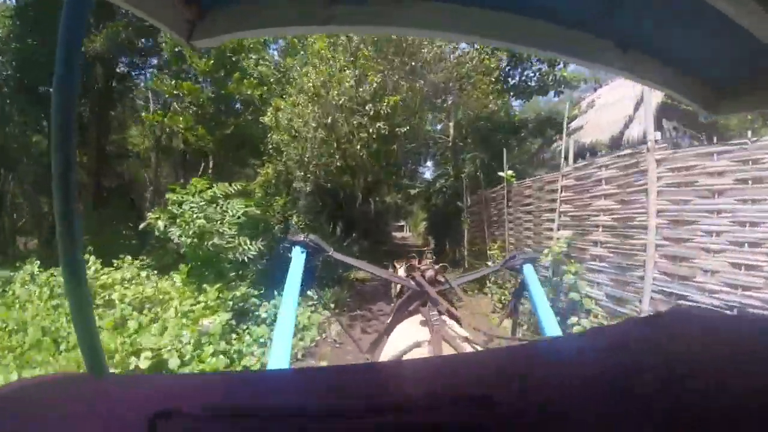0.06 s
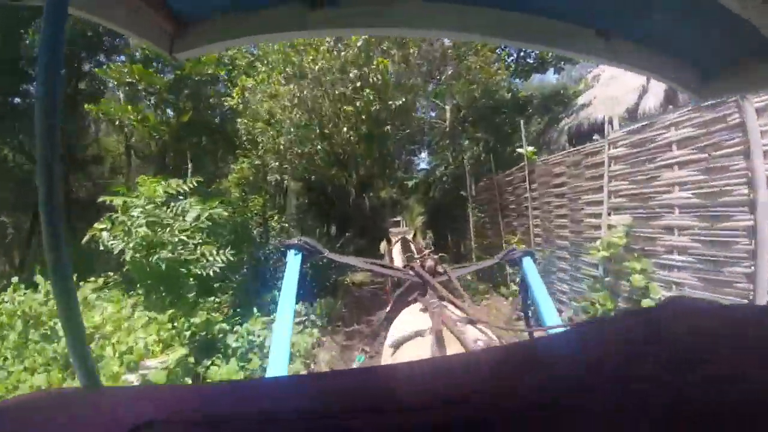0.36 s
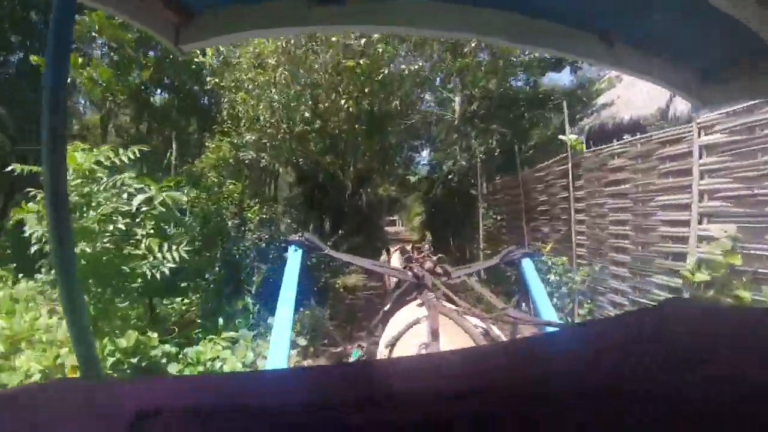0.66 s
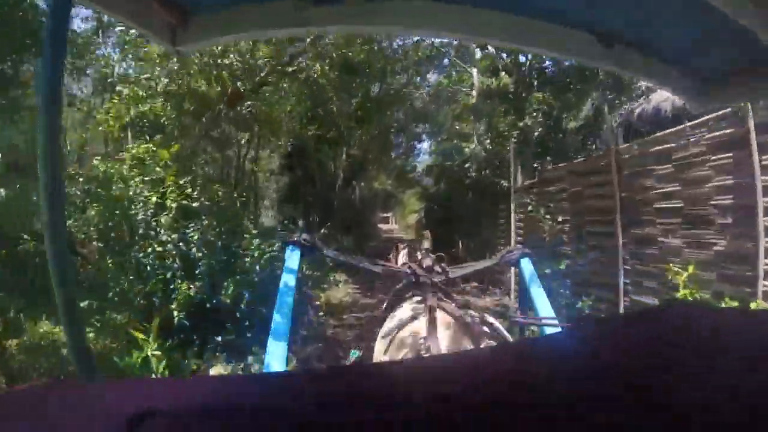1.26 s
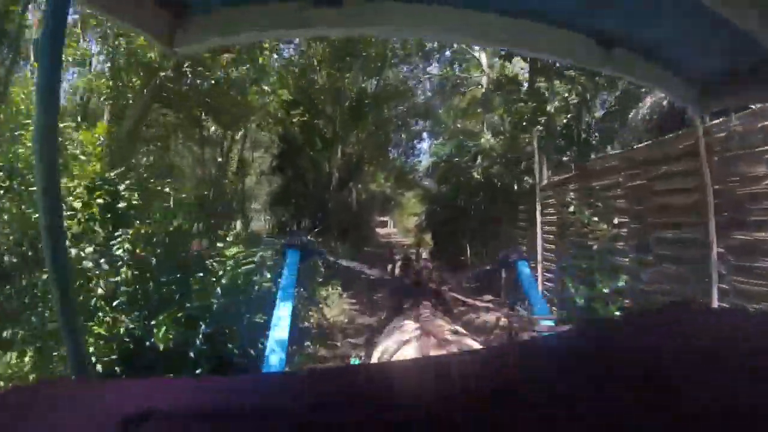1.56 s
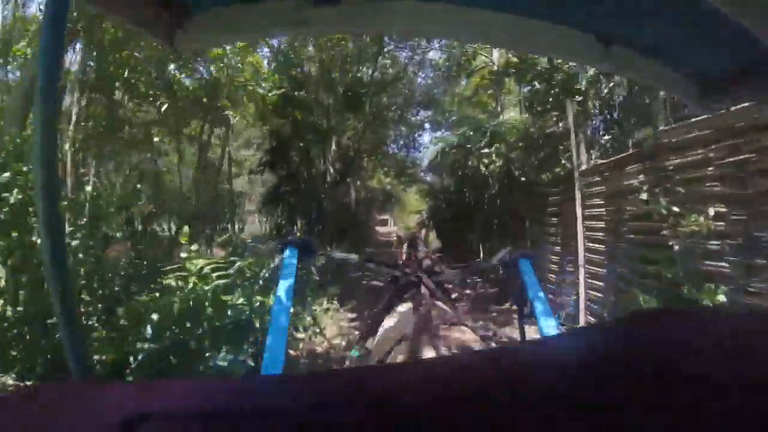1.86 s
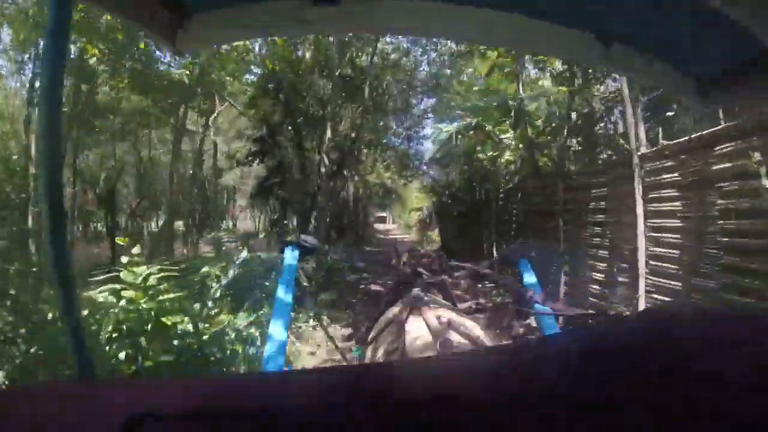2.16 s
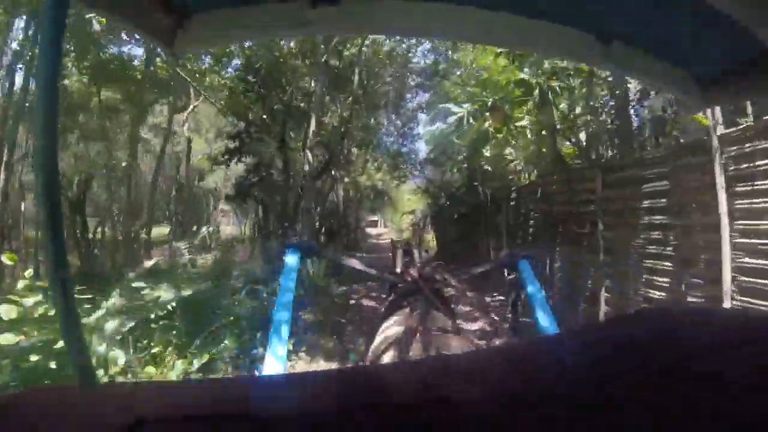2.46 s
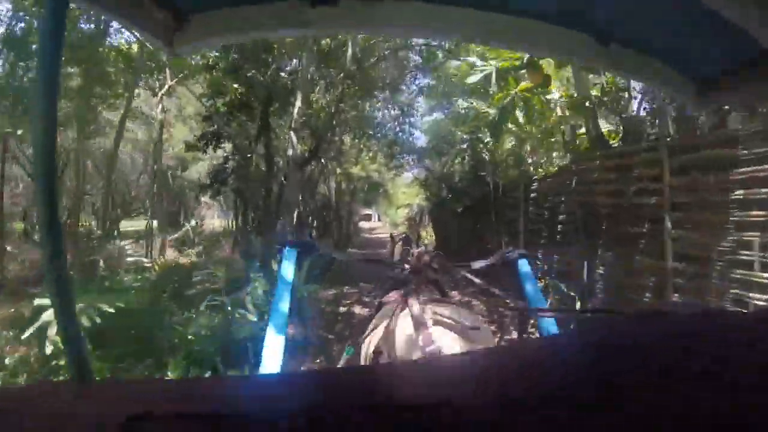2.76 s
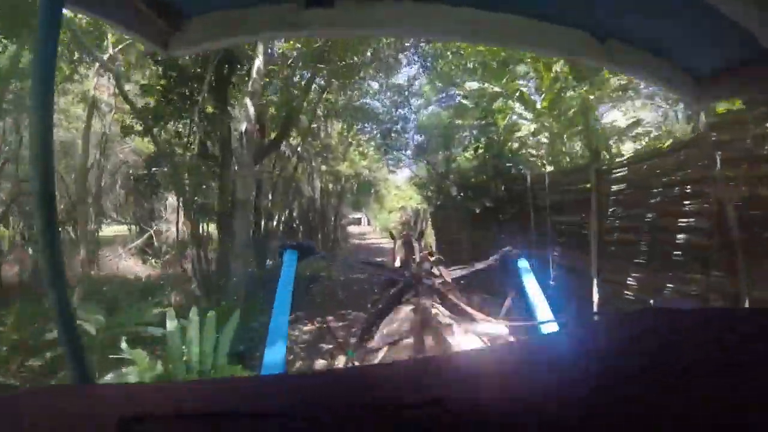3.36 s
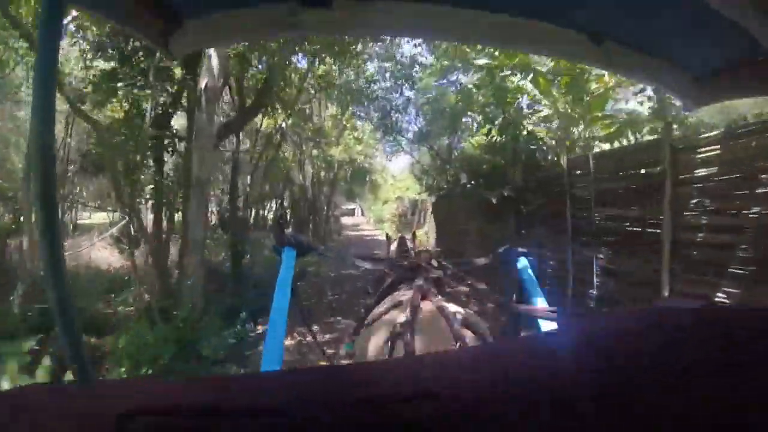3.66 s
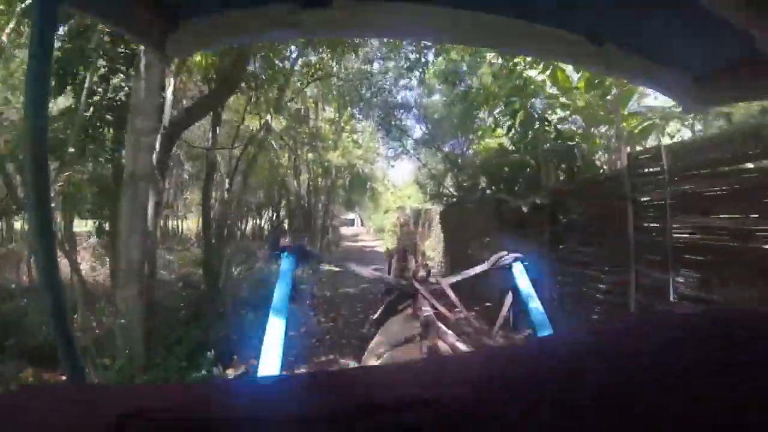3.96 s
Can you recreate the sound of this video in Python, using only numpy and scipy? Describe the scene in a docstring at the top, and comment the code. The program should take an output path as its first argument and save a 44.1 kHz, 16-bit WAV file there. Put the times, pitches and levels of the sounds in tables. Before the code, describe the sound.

Cart wheels grind over grit with wooden knocks, hoof falls and a faint harness bell.

```python
"""Horse cart on a dirt track

Heard from the seat, over the faint hiss of trees, the wheels crunch through grit and slats chatter.
Hoof falls and bumps excite the damped modes of the wooden body, and the frame rumbles. The harness
rustles and ticks; a thin high ringing, probably a small harness bell, comes and goes. Short squeaks and
sharp hoof clicks keep step with the trot."""
import sys
import numpy as np
from scipy import signal
from scipy.fft import rfft, irfft
from scipy.io import wavfile

SR = 44100
rng = np.random.default_rng(int(sys.argv[2]) if len(sys.argv) > 2 else 0)


def bounce(signal):
    """Save signal as a 16-bit WAV file at the path given by the first command-line argument."""
    frames = np.transpose(np.atleast_2d(signal))
    limited = np.clip(frames, -1, 1)
    pcm = np.round(limited * 32767).astype(np.int16)
    wavfile.write(sys.argv[1], SR, pcm)


N = 176400
TIME = np.arange(N) / SR

# Spectra of the woods, the rumble, the grit heard through the cart and the rustling harness.
# Each row: frequency in Hz, relative level in dB.
WOODS_SPECTRUM = [(300,-10.5),(4500,-15),(13000,-37)]
RUMBLE_SPECTRUM = [(24,5),(70,-14.5),(300,-36)]
GRIT_SPECTRUM = [(390, -6), (850, -8.5), (980, 2), (1170, -8.5), (1300, -2), (1420, -10), (1560, 0),
                 (2250, 1), (2540, -10.5), (2890, 0.5), (3140, -15), (3490, -11), (4100, -8.5), (5150, -13),
                 (5600, -12), (6890, -27)]
RUSTLE_SPECTRUM = [(5500,10),(6800,-3),(9700,-5),(10600,-37)]
# Patches of grit under a wheel. Each row: start in seconds, length in seconds, relative level in dB.
GRIT_PATCHES = [(0.023,0.046,-44.5),(0.089,0.086,-45),(0.134,0.047,-32.5),(0.196,0.093,-35.5),(0.276,0.14,-39),(0.471,0.039,-37),
                (0.602,0.12,-43),(0.65,0.015,-38.5),(0.765,0.065,-41),(0.862,0.084,-41),(0.98,0.014,-40),(1.014,0.07,-44),
                (1.123,0.058,-39.5),(1.283,0.051,-42),(1.365,0.037,-40.5),(1.427,0.025,-39.5),(1.496,0.027,-37),
                (1.585,.145,-44),(1.758,0.057,-41.5),(1.881,0.014,-43),(1.959,0.0042,-39),(2.038,0.021,-44),(2.14,0.085,-41.5),
                (2.264,0.018,-38.5),(2.314,0.026,-39),(2.404,0.023,-45.5),(2.679,0.041,-39),(2.747,0.04,-41.5),(2.797,0.0046,-42),(2.841,0.023,-40.5),(2.945,0.011,-43),
                (3.056,0.027,-43.5),(3.143,0.075,-39),(3.262,0.1,-46),(3.3,0.016,-35),(3.53,0.11,-47.5),(3.613,0.075,-40),
                (3.76,0.025,-37),(3.799,0.11,-42),(3.951,0.022,-40.5)]
# Hoof falls and bumps. Each row: time in seconds, then drive to boards, frame and panels in dB.
BODY_BLOWS = [(0.153, -36, -27, -29), (0.469, -45, -41, -68), (.56, -46, -45, -50), (0.761, -35, -55, -55),
              (.797, -44, -56, -31), (0.852, -36.5, -53, -43), (0.947, -38, -35.5, -36.5),
              (1.005, -43, -38.5, -66), (1.1, -43, -43, -48), (1.268, -37.5, -45, -51),
              (1.492, -36, -39.5, -37.5), (1.758, -33.5, -35, -38.5), (1.951, -35, -40.5, -40.5),
              (2.253, -43, -36.5, -53), (2.399, -36.5, -40, -37.5), (2.527, -33.5, -38, -37),
              (2.566, -51, -50, -40.5), (2.836, -34.5, -36, -34.5), (3.301, -39, -59, -27.5),
              (3.531, -40.5, -44, -65), (3.666, -39.5, -58, -51), (3.751, -40, -41, -49),
              (3.949, -36.5, -39, -61)]
# Modes of the wooden parts, the harness rings and the bell, whose first two beat together.
# Each row: frequency in Hz, relative level in dB, time to decay by 60 dB in seconds.
FRAME_RESONANCES = [(30.7, 6.5, 0.22), (79.5, 10, 0.053)]
BOARD_RESONANCES = [(174, 1.3, 0.017), (279, 1.44, 0.097)]
PANEL_RESONANCES = [(485, 0.046, 0.028), (813, 0.42, 0.014), (970, 0.26, 0.017), (1720, 0.074, .008)]
SLAT_RESONANCES = [(1009, 2, 0.019), (1748, -2.5, 0.017)]
RING_RESONANCES = [(7800, 6, 0.079), (9500, -18, 0.038)]
BELL_RESONANCES = [(4804, 0, .42), (4836, -1.5, .3), (12150, -26, .15)]
# Blows to the harness rings and to the bell. Each row: start in seconds, drive in dB.
RING_BLOWS = [(.505,-52.5),(1.497,-61),(2.028,-59.5),(2.997,-63),(3.265,-63)]
BELL_BLOWS = [(1.055,-51),(1.47,-49.5),(1.52,-49),(1.615,-45),(1.81,-47.5),(2.015,-44),(2.15,-46.5),(2.452,-53.5),(2.548,-50.5),(2.622,-43),(2.675,-48),(2.92,-58.5),(3.035,-55),(3.16,-44),(3.402,-51.5),(3.573,-43)]
# Short squeaks and sharp hoof clicks near 2.75 kHz, in step with the trot.
# Each row: centre in seconds, frequency in Hz, peak level in dB, half length in seconds.
SQUEAKS_AND_CLICKS = [(1.385,2800,-43.5,0.014),(1.639,2700,-39.5,0.01),(1.876,2700,-47.5,0.012),(2.127,2720,-37.5,0.0056),(2.573,2770,-37.5,0.002),(3.116,2820,-49,0.0058)]


def from_db(db):
    """Amplitude grows tenfold for every 20 dB."""
    return 10 ** (np.asarray(db) / 20)


def rms_one(x):
    """Dividing by the rms gives a signal unit power."""
    return x / np.sqrt(np.mean(np.square(x)))


def low_pass(x, hz, order=2):
    """A Butterworth filter attenuates what lies above its cutoff."""
    return signal.sosfilt(signal.butter(order, hz, fs=SR, output="sos"), x)


def drift(hz):
    """Low-passed noise makes a smooth random fluctuation of rms 1."""
    return rms_one(low_pass(rng.standard_normal(N), hz))


def coloured(x, spectrum):
    """Spectral weighting colours a signal, falling 12 dB an octave beyond the table's ends; rms 1."""
    hz, db = np.transpose(spectrum)
    f = np.maximum(np.fft.rfftfreq(N) * SR, 1)
    skirts = np.minimum(np.minimum(f / hz.min(), hz.max() / f), 1) ** 2
    gain = from_db(np.interp(np.log(f), np.log(hz), db))
    return rms_one(irfft(rfft(x) * skirts * gain, N))


def grains(per_s=5000):
    """Independent tiny impacts form a Poisson train of clicks of uneven size."""
    sizes = from_db(1.5 * rng.exponential(size=N)) * np.sign(rng.standard_normal(N))
    return sizes * (rng.random(N) < per_s / SR)


def ring(x, modes):
    """By superposition, a body answers each click with a sum of damped sinusoids."""
    out = 0
    for k, (hz, db, t60) in enumerate(modes):
        radius, angle = from_db(-60 / (t60 * SR)), 2 * np.pi * hz / SR
        real = radius * np.cos(angle)
        mode = signal.lfilter([1, -real], [1, -2 * real, radius ** 2], x)
        out = out + (-1) ** k * from_db(db) * mode
    return out


def blows(rows, modes, rattle_share, rattle_s=0.0032):
    """A contact and a brief rattle excite the modes, with the ringing energy of one clean click."""
    out, t = np.zeros(N + SR), TIME[:SR]
    click = signal.unit_impulse(len(t))
    click_norm = np.linalg.norm(ring(click, modes))
    for s, db in rows:
        rattle = rng.standard_normal(len(t)) * t * np.exp(-t / rattle_s)
        force = (1 - rattle_share) * click + rattle_share * rattle / np.linalg.norm(rattle)
        sound = ring(force, modes)
        start = int(s * SR)
        out[start:start + len(t)] += from_db(db) * sound * click_norm / np.linalg.norm(sound)
    return out[:N]


def woods():
    """Steady broadband noise is heard as the faint hiss of the trees."""
    return from_db(-59) * coloured(rng.standard_normal(N), WOODS_SPECTRUM)


def wheel_load(rolling_db=-61, attack_s=0.012, overhang_s=0.0051, steepness=6.46):
    """Incoherent sources add in power: steady rolling and spurts of grit form the grinding envelope."""
    power = from_db(rolling_db) ** 2
    for start, length, db in GRIT_PATCHES:
        age = np.maximum(TIME - start, 0)
        attack = .5 + .5 * np.tanh(2 * (TIME - start) / attack_s)
        release = np.exp(-(age / (length + overhang_s)) ** steepness)
        power = power + (from_db(db) * attack) ** 2 * release
    return np.sqrt(power)


def body_rumble(load):
    """Rolling forces the body into vibration, which eases when the load falls below its mean."""
    hum = from_db(-58.5) * rms_one(low_pass(ring(grains(), BOARD_RESONANCES), 320))
    rumble = from_db(-38) * coloured(rng.standard_normal(N), RUMBLE_SPECTRUM)
    drive = rms_one(np.minimum(load, load.mean()) ** .3)
    return (hum + rumble) * drive


def wheel_crunch(load, patchy_db=2.5):
    """Grit cracking under the rims makes shot noise, whose woody and bright bands fluctuate separately."""
    grit = coloured(grains(), GRIT_SPECTRUM)
    woody = signal.sosfiltfilt(signal.butter(2, 1400, fs=SR, output="sos"), grit)
    bright = grit - woody
    patchy = sum(band * from_db(patchy_db * drift(hz=29.4)) for band in (woody, bright))
    return low_pass(load * from_db(-2.5) * patchy, hz=5960, order=10)


def slat_clatter(load):
    """Random impacts excite the modes of loose slats in proportion to the grinding."""
    return load * from_db(-14.5) * rms_one(ring(grains(per_s=250), SLAT_RESONANCES))


def body_knocks(bump_delay_s=0.00309, jolt_lead_s=.007, jolt_gain_db=-4.5):
    """Impacts ring the modes of frame, boards and panels; grit away from a bump jolts the boards alone."""
    times, board_db, frame_db, panel_db = np.transpose(BODY_BLOWS)
    times = times + bump_delay_s
    jolts = [(start - jolt_lead_s, db + jolt_gain_db) for start, _, db in GRIT_PATCHES
             if np.min(abs(times - start)) > .04]
    frame = blows(zip(times, frame_db), FRAME_RESONANCES, rattle_share=0)
    boards = blows([*zip(times, board_db), *jolts], BOARD_RESONANCES, rattle_share=0.32)
    panels = blows(zip(times, panel_db), PANEL_RESONANCES, rattle_share=0.48)
    return -(low_pass(frame, 190) + low_pass(boards, 600, order=4) + low_pass(panels, 2400, order=4))


def harness_rustle(stride_s=.495, first_stride_s=.185, floor_db=-66, swing_db=10.5):
    """Amplitude modulation by the stride makes the harness's fine crackle swell periodically."""
    stride = np.cos(np.pi * (TIME - first_stride_s) / stride_s) ** 12
    return from_db(floor_db + swing_db * stride) * coloured(grains(per_s=1500), RUSTLE_SPECTRUM)


def harness_ticks():
    """The rings' high modes are strongly damped, so each brief rattle is heard as a tick."""
    return blows(RING_BLOWS, RING_RESONANCES, rattle_share=1, rattle_s=.005)


def harness_bell():
    """Two close modes beat after each jolt, and the shivering clapper excites them faintly in between."""
    times = [s for s, _ in BELL_BLOWS]
    shiver = grains(per_s=120) * (TIME > min(times)) * (TIME < max(times))
    jingles = blows(BELL_BLOWS, BELL_RESONANCES, rattle_share=0.7, rattle_s=0.012)
    return jingles + from_db(-60) * rms_one(ring(shiver, BELL_RESONANCES))


def squeaks_and_hoof_clicks(roughness_rad=.95):
    """Tone bursts roughened by phase modulation sound as squeaks or, when very brief, as hoof clicks."""
    wobble = roughness_rad * drift(hz=180)
    out = np.zeros(N)
    for centre, hz, db, half_length in SQUEAKS_AND_CLICKS:
        envelope = np.exp(-((TIME - centre) / half_length) ** 2)
        out += from_db(db) * envelope * np.sin(2 * np.pi * hz * TIME + wobble)
    return out


def scene():
    """The pressures of woods, cart and horse add linearly at the seat, in one channel."""
    air = woods()
    load = wheel_load()
    cart = body_rumble(load) + wheel_crunch(load) + slat_clatter(load) + body_knocks()
    horse = harness_rustle() + harness_ticks() + harness_bell() + squeaks_and_hoof_clicks()
    return (air + cart + horse)[None]


def record(dry):
    """Band limiting removes the deepest bass and the highest treble."""
    bass_cut = signal.butter(2, 18, "high", fs=SR, output="sos")
    treble_cut = signal.ellip(10, .2, 80, 13200, fs=SR, output="sos")
    return signal.sosfilt(treble_cut, signal.sosfilt(bass_cut, dry))


dry = scene()
out = record(dry)
bounce(out)
```